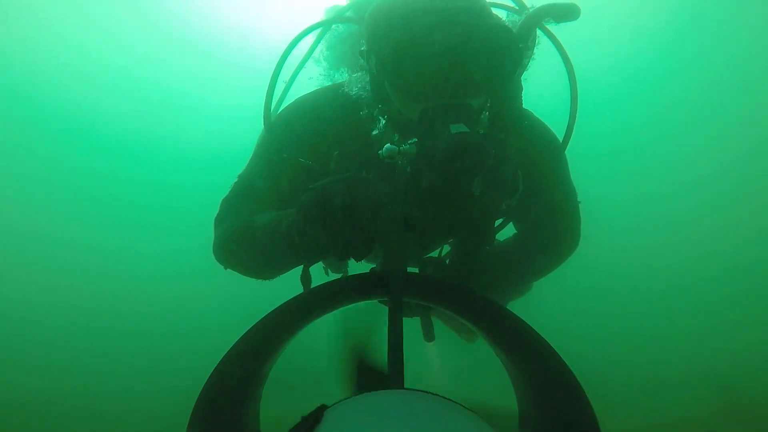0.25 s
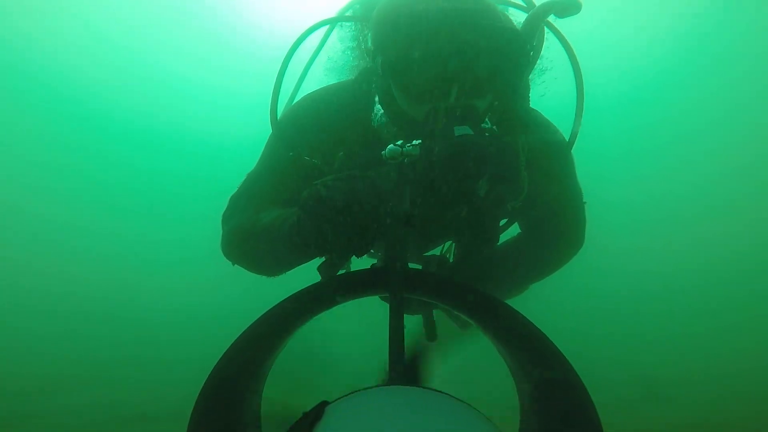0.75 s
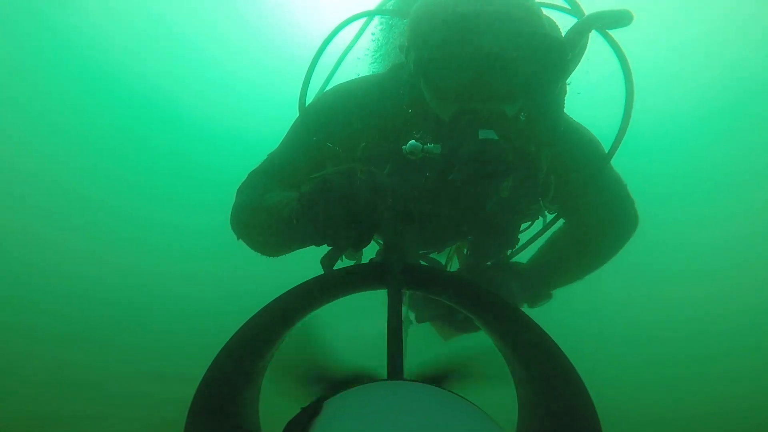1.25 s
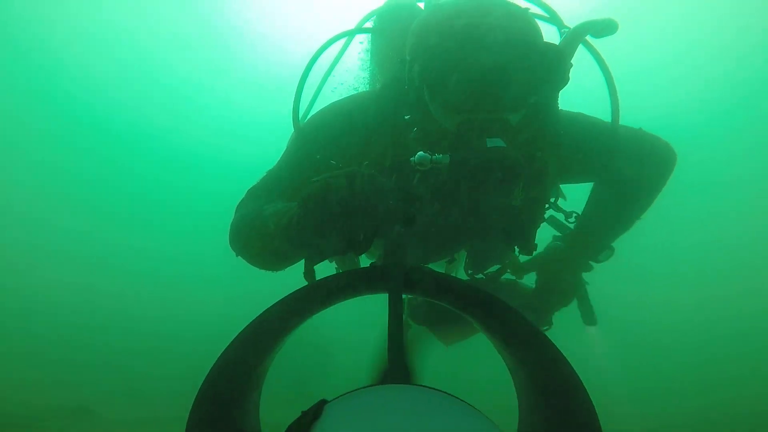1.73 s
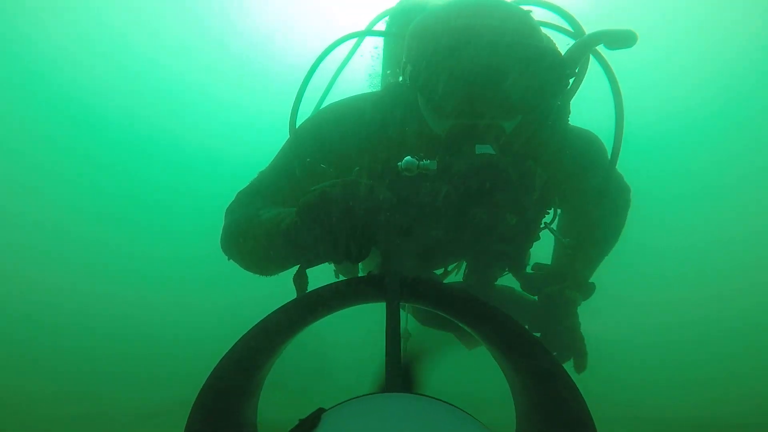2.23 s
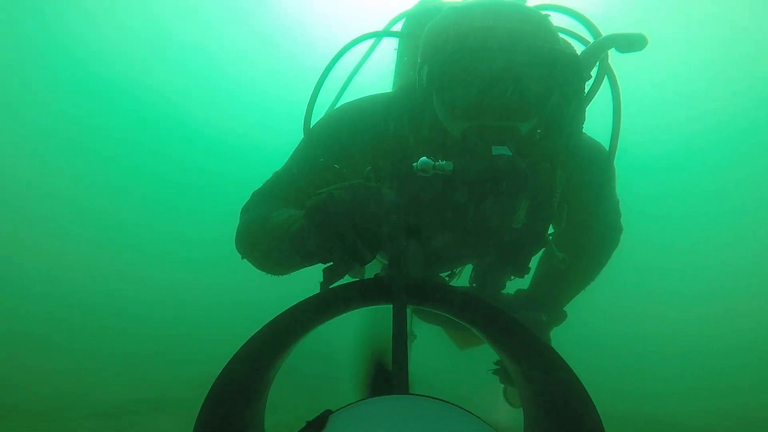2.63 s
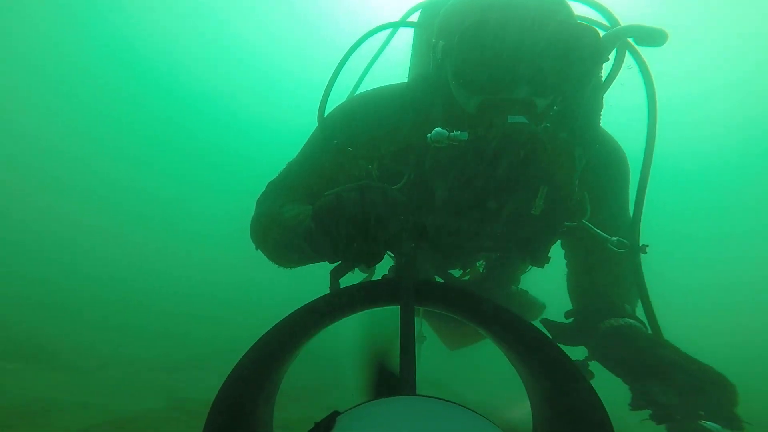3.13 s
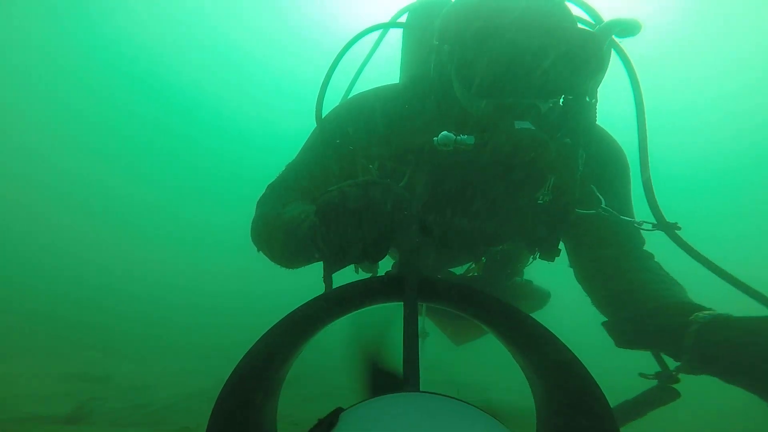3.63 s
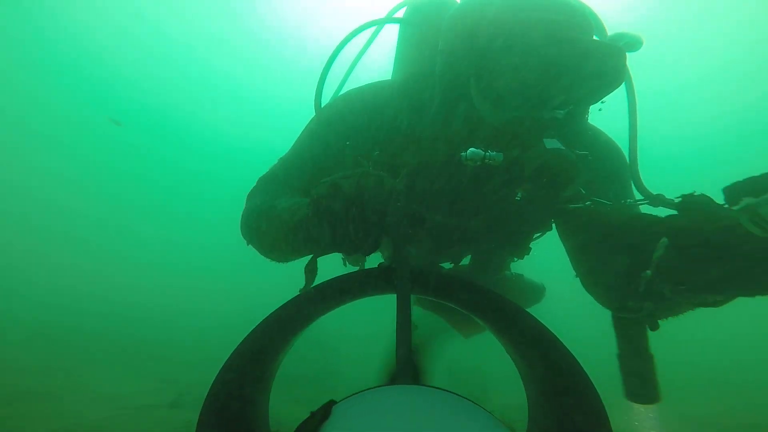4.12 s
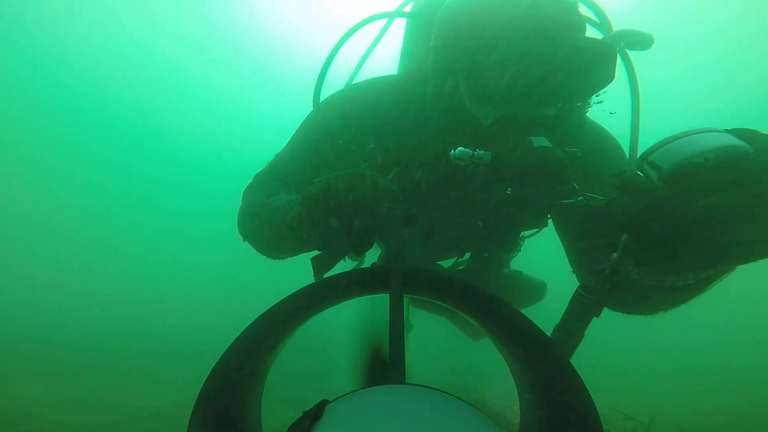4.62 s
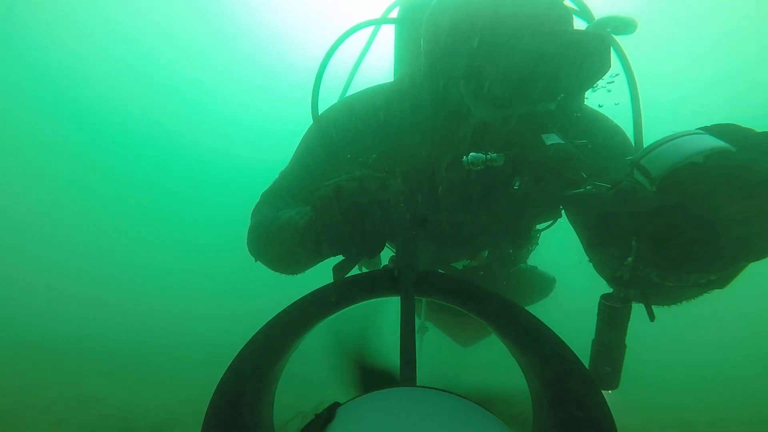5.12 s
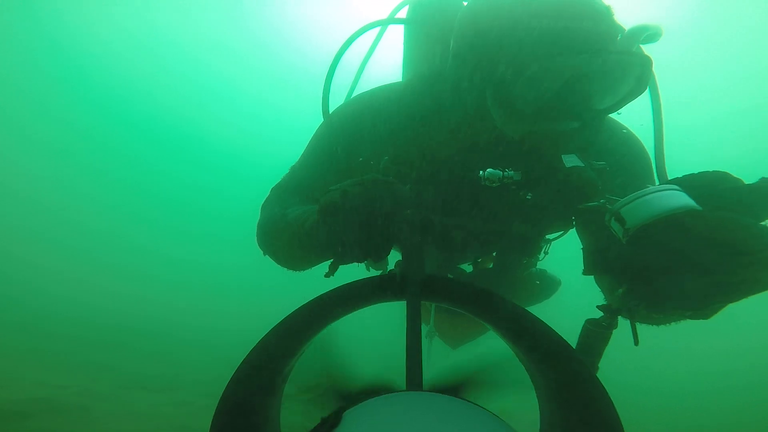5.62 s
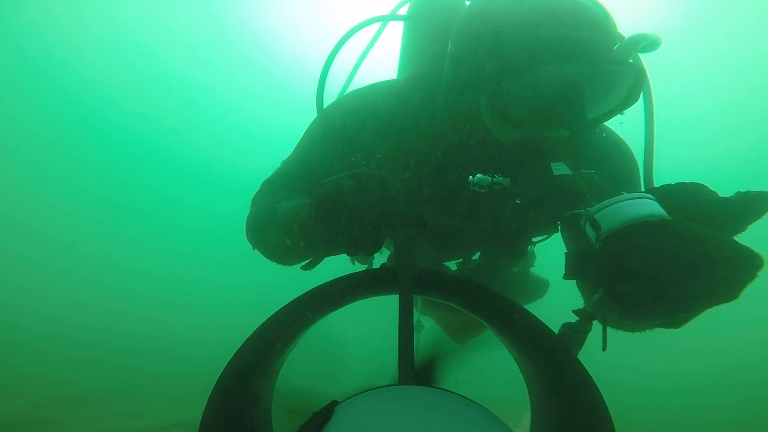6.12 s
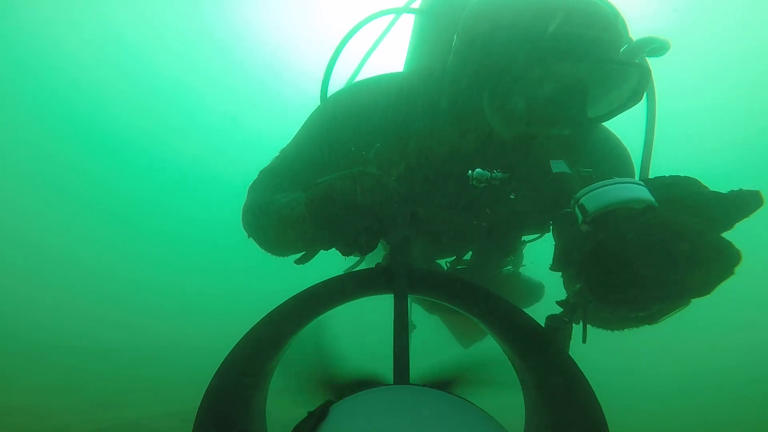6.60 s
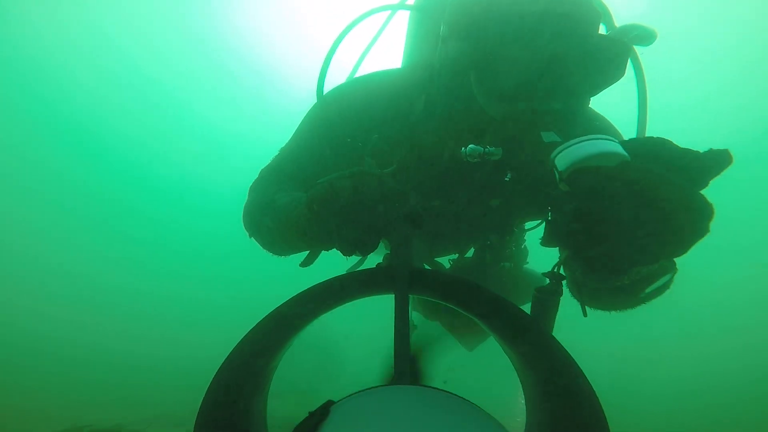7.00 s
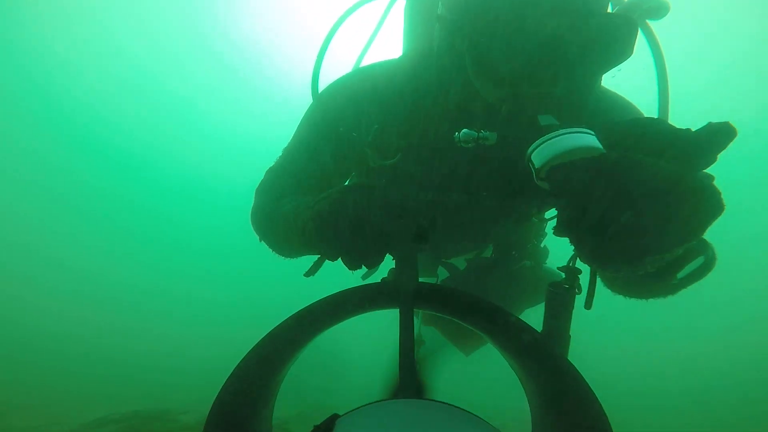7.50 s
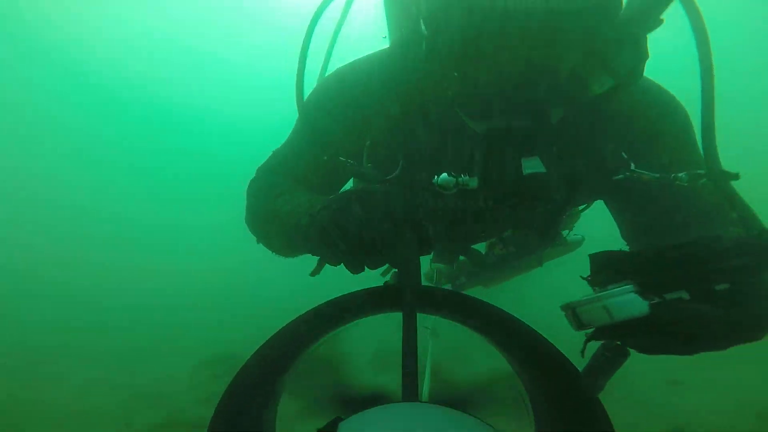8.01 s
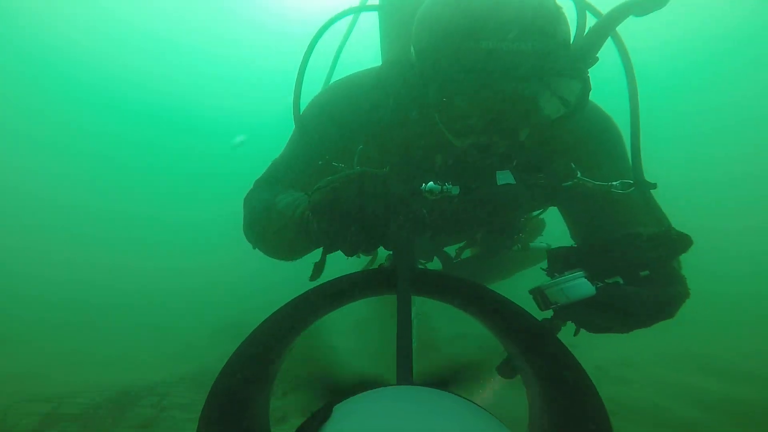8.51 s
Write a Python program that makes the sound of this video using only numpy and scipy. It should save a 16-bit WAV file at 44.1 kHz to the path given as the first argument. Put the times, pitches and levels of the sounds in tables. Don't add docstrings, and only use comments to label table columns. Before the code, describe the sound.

A steady low electric motor hum with throbbing propeller and muffled underwater rumble, loose gear ticking and bumping, then glove scrapes and hard knocks near the end.

```python
import sys
import numpy as np
from scipy import signal
from scipy.fft import rfft, irfft
from scipy.io import wavfile
from scipy.ndimage import uniform_filter1d, minimum_filter1d

SR = 44100
rng = np.random.default_rng(int(sys.argv[2]) if len(sys.argv) > 2 else 0)


def magnitude_from_level(level_db):
    exponent = np.asarray(level_db, float) / 20
    return 10 ** exponent


def store_pcm(level_fs):
    pcm = np.round(np.clip(level_fs, -1, 1) * 32767).astype(np.int16)
    wavfile.write(sys.argv[1], SR, np.atleast_2d(pcm).T)


N = 385875
PORT_LAG_S = .00052
DUCK_S = 7.768


def clock(count):
    return np.arange(count) / SR


def unit(x):
    return x / np.sqrt(np.mean(x ** 2))


def noise():
    return rng.standard_normal(N)


def walk(rate):
    k = int(SR / rate)
    steps = np.repeat(rng.standard_normal(N // k + 1), k)
    return unit(uniform_filter1d(uniform_filter1d(steps, k), k)[:N])


def band(x, lo_hz, hi_hz):
    return signal.sosfilt(signal.butter(2, [lo_hz, hi_hz], "bandpass", fs=SR, output="sos"), x)


def low_pass(x, order, hz):
    return signal.sosfilt(signal.butter(order, hz, fs=SR, output="sos"), x)


def below(x, order, hz):
    return signal.sosfiltfilt(signal.butter(order, hz, fs=SR, output="sos"), x)


def ring(x, modes, steep, in_step=False):
    size = 2 ** 15
    f = np.fft.rfftfreq(size, 1 / SR) + 1
    power = 0
    for hz, width_hz, *levels_db in modes:
        off_tune = (f - hz ** 2 / f) / width_hz
        power = power + magnitude_from_level(2 * np.array(levels_db)[:, None]) / (1 + off_tune ** 2) ** steep
    ceps = irfft(np.log(power + 1e-16) / 2)
    ceps[:, 1:size // 2] *= 2
    ceps[:, size // 2 + 1:] = 0
    log = rfft(ceps)
    if in_step:
        log = log.real + 1j * log.imag.mean(axis=0)
    pulse = np.roll(irfft(np.exp(log)), size // 8, axis=1)[:, :size // 2]
    return unit(irfft(rfft(x) * rfft(pulse, N), N))


def ports(x, apart):
    late = np.roll(x, int(PORT_LAG_S * SR))
    return [v * (1 + apart * noise()) for v in (late, x)]


def add(out, s, sound):
    i = int(s * SR)
    out[..., i:i + sound.shape[-1]] += sound[..., :N - i]


# (start_s, blade_rate_hz, strength_db)
BLADE_SPEED = [(0, 27.47, -13.5), (.6, 27.38, -15.5), (1.2, 27.53, -14.5), (1.8, 27.85, -16),
               (2.3, 28.25, -18.5), (3, 28.2, -13.5), (3.7, 28.35, -16.5), (4.3, 28.44, -19),
               (4.7, 28.4, -13), (5.35, 28.44, -18.5), (5.6, 28.32, -12.5), (6.25, 28.55, -20.5),
               (6.6, 28.52, -14), (7.2, 28.56, -16), (7.6, 28.4, -21), (7.95, 28.33, -23),
               (8.4, 28.06, -18.5), (8.75, 28.22, -18)]


def blade_motion():
    start_s, rate_hz, strength_db = np.transpose(BLADE_SPEED)
    t = clock(N)
    turn = 2 * np.pi * np.cumsum(np.interp(t, start_s, rate_hz)) / SR
    clean_db = 0.98 * (np.interp(t, start_s, strength_db) + 15.5)
    return turn, clean_db


# (multiple_of_blade_rate, level_db)
BLADE_TONES = [(1, -21), (2, -25.5), (4, -35.5), (5, -30), (6, -16.5), (7, -10.5), (8, -25), (10, -4),
               (11, -15.5), (15, -21.5), (18, -33.5), (20, -27.5)]


def blades(turn, clean_db):
    tones = 0
    for k, db in BLADE_TONES:
        swell = magnitude_from_level(db + 1.2 * walk(3.0))
        tones = tones + swell * np.sin(k * turn + 0.26 * k ** .5 * walk(4.0))
    return tones * magnitude_from_level([[-.7], [.7]]) * magnitude_from_level(clean_db)


# (pitch_hz, width_hz, left_db, right_db)
HULL_MODES = [(159.5, 40, -21, -16.5), (200.7, 25, -8, -7.5), (210, 47, -18.5, -17), (237, 46, -15, -12.5),
              (268.3, 30.7, -2, 0), (331, 3.7, -17, -23)]


def hull(turn):
    push = noise() * (1 + 0.5 * np.cos(turn)) * (1 + 0.26 * np.cos(turn / 2))
    return ring([push + 0.049 * noise(), push + 0.01 * noise()], HULL_MODES, steep=1.844)


# (pitch_hz, width_hz, left_db, right_db)
MOUNT_MODES = [(27, 4.4, -3.5, -2), (38.43, 6.2, 7, 8), (53.7, 7.8, -6.5, -4.5), (97, 22, -26, -24)]
# (start_s, level_db)
SWAY = [(0, -18), (1.9, -19.5), (2.3, -16.5), (2.75, -17), (3.5, -21), (4.1, -20.5), (4.44, -17),
        (4.8, -23), (5.45, -19), (5.7, -25.5), (6.4, -22), (7.15, -20.5), (7.39, -17.5), (7.62, -15),
        (7.76, -18.5), (7.85, -15), (8.1, -20)]


def mount():
    push = noise()
    eddies = unit(band(rng.standard_normal((2, N)), 68, 110)) * magnitude_from_level(-18.5)
    pushes = [push + 0.072 * noise(), push + 0.032 * noise()]
    swing = ring(pushes, MOUNT_MODES, steep=1.236, in_step=True)
    sway_db = np.interp(clock(N), *np.transpose(SWAY))
    return magnitude_from_level(sway_db - 4.5) * (swing + eddies)


# (start_s, peak_db, pitch_hz, fade_60db_s)
KNOCKS = [
    (7.335, -8, 39.46, .5),
    (7.461, -13, 297.5, 0.13),
    (7.575, -11, 42.3, 0.1),
    (7.669, -11.5, 269, 0.055),
    (7.7195, -13, 50, .09),
    (7.7554, -.5, 280, 0.095),
]


def knocks():
    out, t = np.zeros((2, N)), clock(SR // 2)
    soft = 1 - np.exp(-t / 0.0028)
    for s, db, hz, fade_s in KNOCKS:
        fade = magnitude_from_level(db - 60 * (t / fade_s) ** 2)
        add(out, s, np.sin(2 * np.pi * hz * t) * soft * fade * np.ones((2, 1)))
    return out


# (start_s, peak_db, pitch_hz, left_minus_right_db)
TICKS = [(0.778, -27, 1228, -11), (1.3615, -18, 1382, -10.5), (1.3885, -14, 1450, -1.5),
         (2.995, -29, 2100, -2), (1.4995, -21, 1490, 6), (2.5821, -24, 1000, -5),
         (2.9568, -22.5, 2100, -2.5), (3.1183, -34, 1025, -3), (3.3142, -26.5, 1330, 1),
         (3.3486, -24.5, 2060, -3), (3.3856, -19, 2043, -2.5), (3.4215, -24.5, 1990, 0),
         (3.27, -26.5, 1560, 9), (3.284, -26.5, 1850, -11), (3.4613, -25.5, 1470, -5),
         (3.4956, -28, 1320, -6.5), (3.8617, -30.5, 1850, -5), (4.2513, -35.5, 1400, -4),
         (4.265, -29, 1694, -3), (4.427, -30.5, 2045, 1), (4.5, -36.5, 2015, -1), (5.5696, -30, 1500, 1),
         (5.6104, -31, 1980, 0.5), (5.71, -37.5, 2010, 0.5), (5.779, -27.5, 1950, 3),
         (5.8563, -34.5, 2120, 3.5), (5.8836, -47, 1780, -2), (5.9549, -30.5, 1710, 3),
         (6.485, -29.5, 1940, 1), (1.3317, -34, 1450, -6), (3.53, -25.5, 2030, 0),
         (3.8279, -28.5, 1170, -4), (3.8981, -36, 1057, 17.5), (4.299, -20.5, 1079, 0),
         (4.3619, -24.5, 2147, 0.5), (4.3962, -26, 1030, 0), (4.4663, -23, 2025, 3),
         (4.541, -30.5, 1460, 11.5), (4.9012, -40.5, 1040, -9), (5.5403, -29.5, 1890, -7),
         (5.6435, -19.5, 1430, 1), (5.7434, -24.5, 2030, -2), (5.816, -27, 1850, 7.5),
         (6.4011, -24, 1530, 0), (6.4735, -25, 1075, 3.5), (6.923, -24, 1440, -3.5),
         (7.1661, -26.5, 2010, -6)]
# (start_s, peak_db, pitch_hz, left_minus_right_db)
TAPS = [
    (7.5622, -25.5, 1335, -20),
    (7.5916, -17.5, 894, -14),
    (7.6065, -26, 1940, -18),
    (7.6481, -25, 2120, 1),
    (7.6748, -26, 1000, -3.5),
    (7.7247, -21, 2020, -2),
    (7.7555, -10.5, 2000, -3.5),
    (7.7556, -17, 1259, -3),
    (7.7096, -28, 2150, -2),
    (7.745, -30, 2100, -2),
]


def water_cushion(t):
    return 1 - np.exp(-t / 0.00079)


def gear():
    out, t = np.zeros((2, N)), clock(SR // 16)
    soft = water_cushion(t)
    swell = 1.21 * (1 - np.exp(-(t / 0.0025) ** 2))
    for s, db, hz, pan_db in TICKS + TAPS:
        rattle = rng.standard_normal(len(t)) * np.exp(-t / 0.012)
        rattle = band(band(rattle, 1200, 2200), 1200, 2200)
        strike = band(rng.standard_normal(len(t)) * np.exp(-t / 0.0019), 1300, 2600)
        part = swell * np.sin(2 * np.pi * hz * t) * np.exp(-t / 0.0028)
        part = part + soft * (0.61 * rattle + .8 * strike)
        thud_db = 6 - 6 * np.log2(hz / 1000)
        thud = soft * np.sin(2 * np.pi * 720 * t) * np.exp(-t / 0.0034) * magnitude_from_level(thud_db)
        pan = magnitude_from_level(db + np.array([pan_db, -pan_db]) / 2)
        add(out[0], s + PORT_LAG_S, pan[0] * part)
        add(out[1], s, pan[1] * part)
        add(out, s, pan[:, None] * thud)
    return out


# (start_s, peak_db, pitch_hz, left_minus_right_db)
CLICKS = [(1.3615, -39, 6160, -3), (1.3876, -46.5, 5900, -2), (1.498, -39.5, 3373, -9),
          (4.4873, -41, 5540, 0.5), (7.5603, -41.5, 6640, -2.5), (7.592, -42, 5550, 8.5),
          (7.604, -45.5, 6450, 3.5), (7.671, -49.5, 5750, 4.5), (7.7233, -32.5, 6300, -4),
          (7.755, -30.5, 6200, -1), (7.7672, -55.5, 5440, -1.5), (8.4238, -45, 7460, 3.5)]


def clasps():
    out, t = np.zeros((2, N)), clock(SR // 16)
    for s, db, hz, pan_db in CLICKS:
        burst = rng.standard_normal((2, len(t))) * np.exp(-t / .003)
        snap = band(burst, 2400, 4200) + band(burst, 5000, 11000)
        click = water_cushion(t) * (np.sin(2 * np.pi * hz * t) * np.exp(-t / .0018) + 1.7 * snap)
        add(out, s, click * magnitude_from_level(db - 1.5 + np.array([[pan_db], [-pan_db]]) / 2))
    return out


# (start_s, length_s, level_db)
STROKES = [
    (7.32, .045, -33.5),
    (7.372, .098, -37),
    (7.487, .06, -40.5),
    (7.553, .055, -43),
]
# (pitch_hz, width_hz, left_db, right_db)
RUB_MIDDLE = [(1300, 230, -1.5, 1.5), (1580, 220, -2, 1.5), (2030, 640, -4.5, -2.5), (3130, 740, -5, -8),
              (4650, 600, -23, -21.5)]
# (pitch_hz, width_hz, left_db, right_db)
RUB_TREBLE = [(5900, 1000, -0.5, -4), (7200, 2700, 5, 5), (9500, 1300, -7, 2)]


def glove():
    t, press = clock(N), 0
    for s, length, db in STROKES:
        attack = np.clip((t - s) / .012, 0, 1)
        press = press + magnitude_from_level(db) * attack * np.exp(-np.maximum(t - s - length, 0) / .014)
    treble_db = -15.5 - 12 * np.clip(t - STROKES[0][0], 0, 1)
    rub = ports(noise() * magnitude_from_level(2.3 * walk(220.0) + 1.5 * walk(60.0)), apart=0.98)
    middle = ring(rub, RUB_MIDDLE, steep=2.6)
    return press * (middle + ring(rub, RUB_TREBLE, steep=2.6) * magnitude_from_level(treble_db))


# (start_s, peak_db, pitch_hz)
BUMPS = [(0.839, -6.5, 411.3), (1.388, -12, 699), (1.796, -10.5, 486), (2.191, -10.5, 666),
         (2.263, -15, 414), (2.333, -23.5, 691), (2.797, -11.5, 688), (2.956, -14.5, 665),
         (3.118, -14.5, 683), (3.35, -5.5, 696), (3.387, -12, 708), (3.423, -13, 689), (3.459, -18, 435),
         (3.527, -18.5, 440), (3.577, -12, 433), (3.828, -11.5, 696), (4.297, -11, 452), (4.359, -6.5, 442),
         (4.499, -8.5, 421), (4.606, -10, 493), (5.571, -19.5, 466), (5.645, -9, 669), (5.777, -9.5, 465),
         (6.333, -10.5, 396), (6.402, -6, 462), (6.47, -5.5, 510), (6.751, -16, 481), (6.92, -15, 714),
         (7.086, -11.5, 417), (7.244, -3.5, 417)]


def hoses():
    out, t = np.zeros((2, N)), clock(SR // 20)
    thud = (1 - np.exp(-t / 0.0012)) * np.exp(-t / .007)
    for s, db, hz in BUMPS:
        add(out, s, np.sin(2 * np.pi * hz * t) * thud * magnitude_from_level(db - 5.5) * np.ones((2, 1)))
    return out


# (start_s, peak_db, pitch_hz)
SPECKS = [(0.3112, -45, 5900), (0.7, -40, 2945), (0.7755, -43, 3210), (1.2141, -45, 2762),
          (4.5352, -44.5, 2810), (4.8996, -41.5, 2996), (5.001, -36, 2873), (5.3888, -41.5, 2810),
          (5.646, -38, 2820), (5.9004, -45, 2830), (6.1108, -45, 2820), (6.2003, -42.5, 2800),
          (6.2907, -44, 2718), (6.5174, -43.5, 3065), (6.772, -40.5, 2895), (6.8696, -44.5, 3165),
          (7.835, -53, 2734), (7.914, -50.5, 2723), (7.97, -51.5, 3230), (7.995, -44.5, 3030),
          (8.1418, -48.5, 2960), (8.2517, -57, 2800), (8.4693, -45.5, 3115), (8.5065, -45.5, 2740),
          (8.543, -50.5, 2752), (8.5777, -45.5, 3950), (4.6993, -45, 5064), (4.83, -46, 5740),
          (5.0535, -45, 5650), (5.1678, -47.5, 5745), (5.2945, -45, 7470), (5.3548, -44.5, 5830),
          (5.6008, -48, 5250), (5.79, -48, 5840), (6.0662, -47, 5730), (6.479, -42, 7400),
          (6.5726, -46, 5850), (6.6525, -45, 5770), (6.828, -46, 5620), (7.1642, -43, 5880),
          (7.2076, -44.5, 5405), (7.258, -46, 5710), (8.035, -50, 7410), (8.095, -50, 5900),
          (8.295, -49, 5900), (8.38, -51, 5710), (8.4146, -48.5, 7350), (8.6559, -46.5, 5590),
          (8.6793, -47, 5650)]


def grit():
    spit, t = np.zeros(N), clock(SR // 20)
    for s, db, hz in SPECKS:
        burst = rng.standard_normal(len(t)) + 0.53 * np.sin(2 * np.pi * hz * t)
        ducked_db = 10.0 * (s > DUCK_S)
        add(spit, s, burst * np.exp(-t / .0064) * magnitude_from_level(db - 13 + ducked_db))
    return ring(ports(spit, apart=.3), TOP_MODES, steep=1.6) * np.sqrt(np.mean(spit ** 2))


# (start_s, peak_db, pitch_hz)
BUBBLES = [
    (2.449, -44, 3240),
    (3.927, -41.5, 2250),
]


def bubbles():
    out, t = np.zeros((2, N)), clock(SR // 20)
    decay_s = .006
    swell = (t / decay_s) * np.exp(1 - t / decay_s * 1.6)
    for s, db, hz in BUBBLES:
        chirp = np.sin(2 * np.pi * hz * t * (1 + 4.0 * t))
        add(out, s, chirp * swell * magnitude_from_level(db) * np.ones((2, 1)))
    return out


# (pitch_hz, width_hz, left_db, right_db)
WALL_MODES = [(357, 97, -5.5, -3.5), (405.3, 61, 0.5, -1.5), (480.7, 65, -3.5, -0.5),
              (575, 59, -4.5, -18.5), (697.2, 94.4, 2.5, -4.5)]


def wall(push):
    drum = ring([push + .25 * noise(), push + 0.15 * noise()], WALL_MODES, steep=1.7)
    drum = low_pass(drum, 3, 900)
    upper = drum[0] - below(drum[0], 4, 600)
    drum[0] += np.roll(upper, int(.00034 * SR)) - upper
    return drum


# (pitch_hz, width_hz, left_db, right_db)
AIR_MODES = [(810, 110, -6, 0), (930, 100, -15, -12), (1070, 140, -19, -18), (1250, 100, -25, -17),
             (1480, 110, -26, -16), (1660, 170, -21, -23), (1780, 120, -27, -19), (2070, 190, -23, -19)]


def air_space(gust, grains):
    own = .95 * gust * band(rng.standard_normal((2, N)), 1150, 1950)
    push = ports(gust * noise() + grains, apart=.27) + own
    return below(ring(push, AIR_MODES, steep=1.7, in_step=True), 2, 3200)


# (pitch_hz, width_hz, left_db, right_db)
TOP_MODES = [(2450, 250, -5, -3), (2950, 400, -3, -1), (3400, 380, -9, -8), (3850, 260, -12, -11),
             (4600, 500, -30, -30), (5350, 260, -9, -5), (5800, 450, -5, -9), (6600, 400, -8, -12),
             (7450, 600, -11, -8), (9300, 1500, -22, -19)]


def thin_top(grains):
    patches = magnitude_from_level(2.5 * walk(14.0) + 3.2 * walk(70.0))
    return ring(ports(patches * noise() + .4 * grains, apart=.8), TOP_MODES, steep=2.2)


def housing(turn, drum_db):
    shudder, t = np.ones(N), clock(SR // 20)
    for s, db, *_ in TICKS + TAPS:
        jolt = np.minimum(t / 0.0044, 1) * np.exp(-(t / 0.0054) ** 2)
        add(shudder, s, min(magnitude_from_level(db + 19.0), 1.5) * jolt)
    gust = magnitude_from_level(1.2 * walk(17.0) + 0.4 * walk(45.0))
    gust = gust * (1 + 0.13 * np.cos(turn) + .15 * np.cos(2 * turn))
    grain_level = magnitude_from_level(np.minimum(5.5 * rng.exponential(size=N), 14)) * 5.0
    grains = (rng.random(N) < 150 / SR) * grain_level
    drum = wall(gust * noise())
    air = air_space(gust, grains)
    low = below(air, 2, 950)
    drum = (drum * magnitude_from_level(-2.0) + unit(low) * magnitude_from_level(-11.5)) * shudder
    t = clock(N)
    sheltered = t > 7.62
    flow_db = -35 - 0.1 * t - 2.5 * sheltered
    top = thin_top(grains) * magnitude_from_level(-24 - 7 * sheltered)
    return drum * magnitude_from_level(drum_db) + magnitude_from_level(flow_db) * (unit(air - low) * shudder * magnitude_from_level(-7.0) + top)


def scene():
    wander_db = -0.67 * walk(1.2)
    turn, clean_db = blade_motion()
    hum = magnitude_from_level(-13.5 + wander_db) * (magnitude_from_level(-5.5) * hull(turn) + magnitude_from_level(0.5) * blades(turn, clean_db))
    flow = housing(turn, drum_db=-25 - 0.29 * wander_db)
    contacts = knocks() + gear() + clasps() + glove() + hoses() + grit()
    return hum + mount() + contacts + bubbles() + flow


def duck(t):
    attack_s, dip_hold_s, dip_release_s, recover_s = .034, .03, .008, 1.0
    since = np.maximum(t - DUCK_S, 0)
    dip_db = -7.5 * np.exp(-np.maximum(since - attack_s - dip_hold_s, 0) / dip_release_s)
    hold_db = -7 * np.clip(1 - (since / recover_s) ** 2, 0, 1)
    return (dip_db + hold_db) * np.minimum(since / attack_s, 1)


def limiter(x):
    span = int(.004 * SR)
    room = np.minimum(.87 / (np.abs(x).max(axis=0) + 1e-9), 1) ** .88
    lowest = minimum_filter1d(room, 2 * span)
    return x * uniform_filter1d(uniform_filter1d(lowest, span), span)


def top_cut(x):
    return signal.sosfilt(signal.butter(12, 13000, fs=SR, output="sos"), x)


def record(dry):
    muffled = low_pass(dry, 5, 9600)
    muffled = muffled - .4 * signal.lfilter(*signal.iirpeak(4550, 5, fs=SR), muffled)
    loud = muffled * magnitude_from_level(5.5 + duck(clock(N)))
    left_s = (N - np.arange(N)) / SR
    loud = loud * np.sin(np.pi / 2 * np.clip(left_s / .003, 0, 1)) ** 2
    return top_cut(limiter(loud))


dry = scene()
out = record(dry)
store_pcm(out)
```